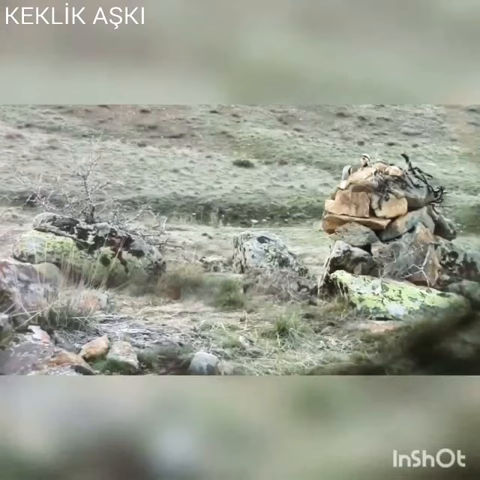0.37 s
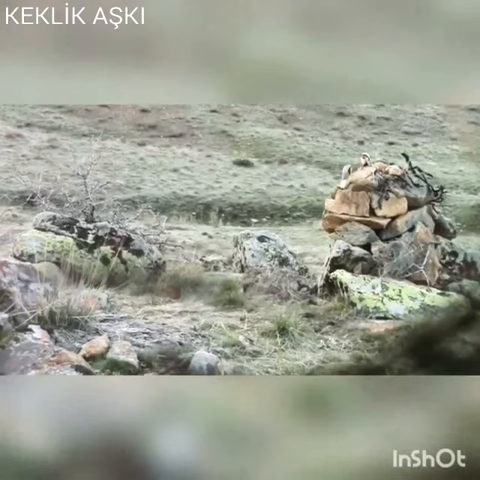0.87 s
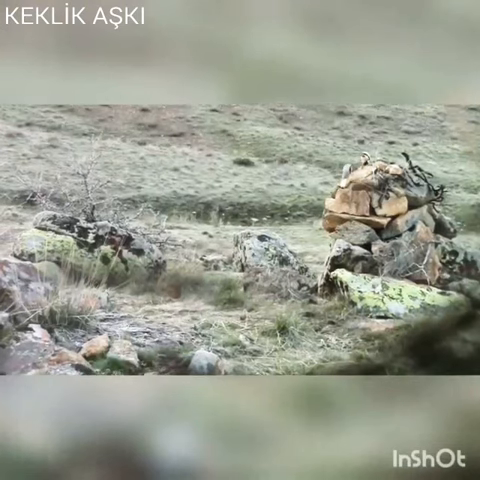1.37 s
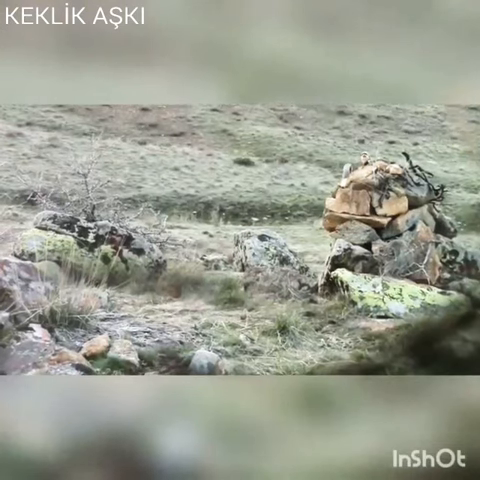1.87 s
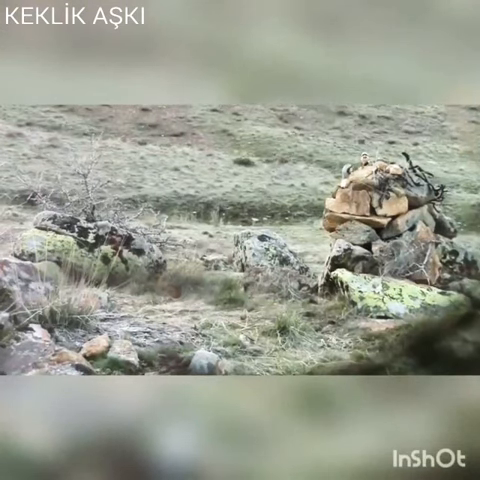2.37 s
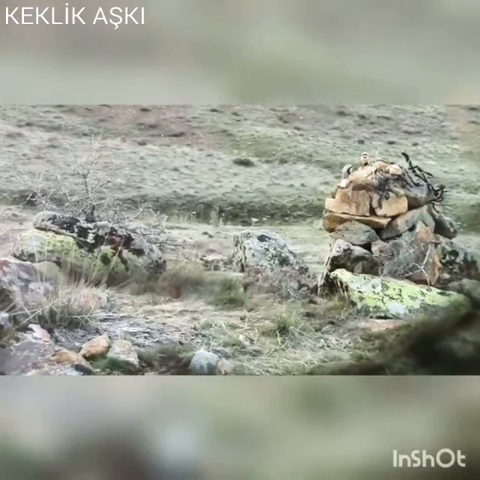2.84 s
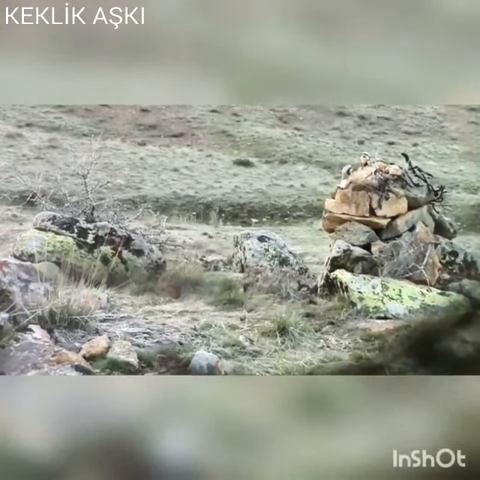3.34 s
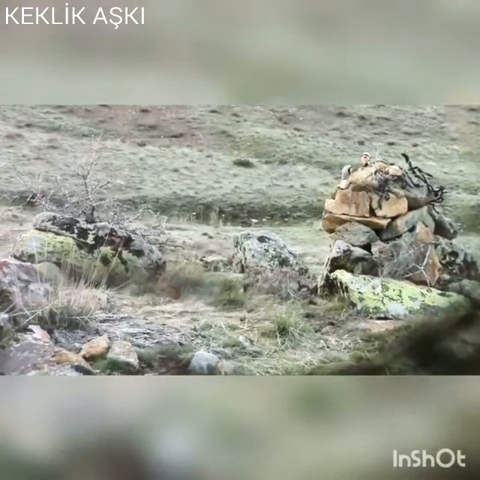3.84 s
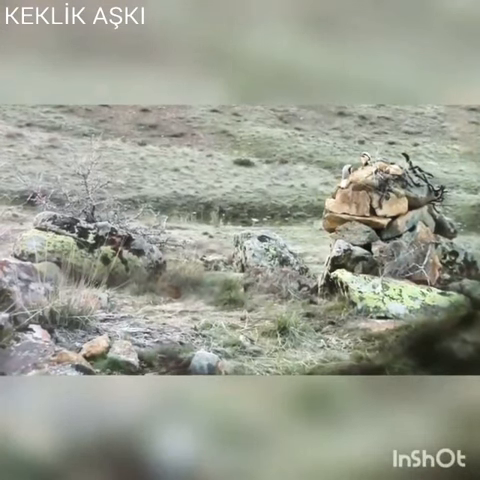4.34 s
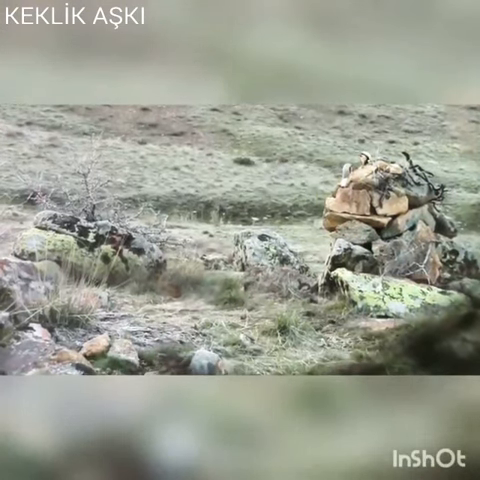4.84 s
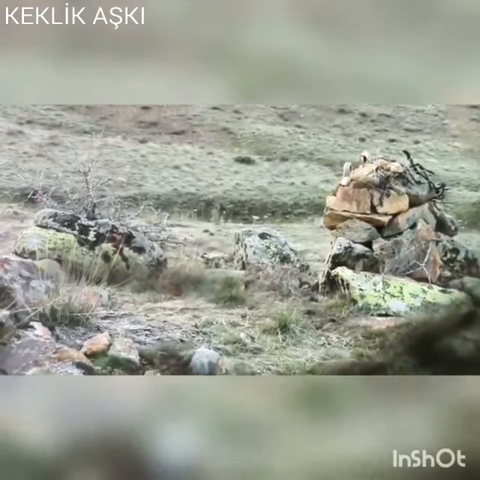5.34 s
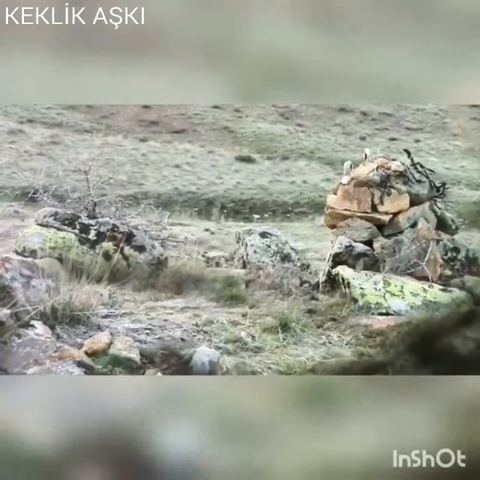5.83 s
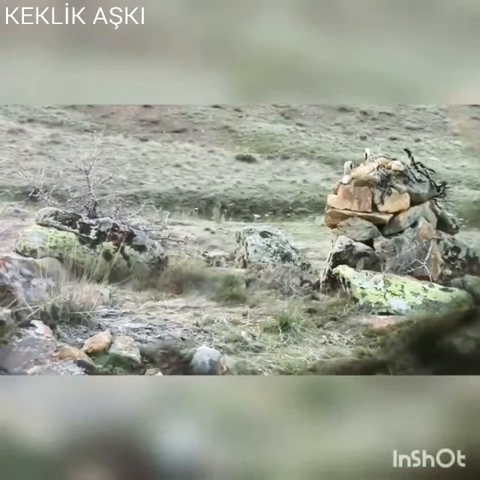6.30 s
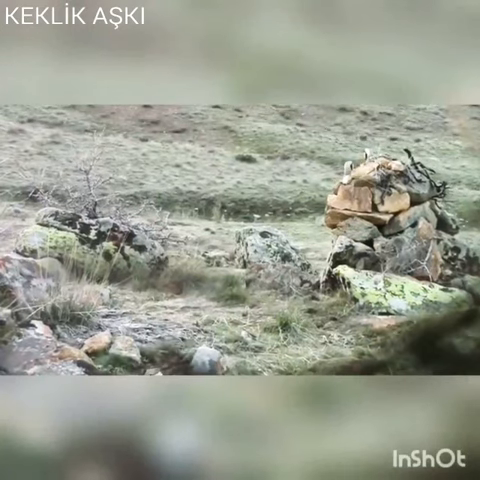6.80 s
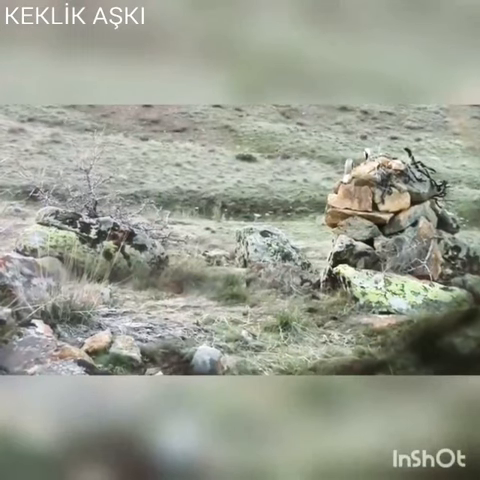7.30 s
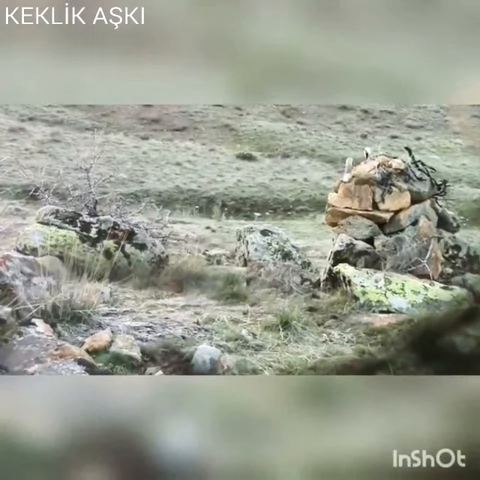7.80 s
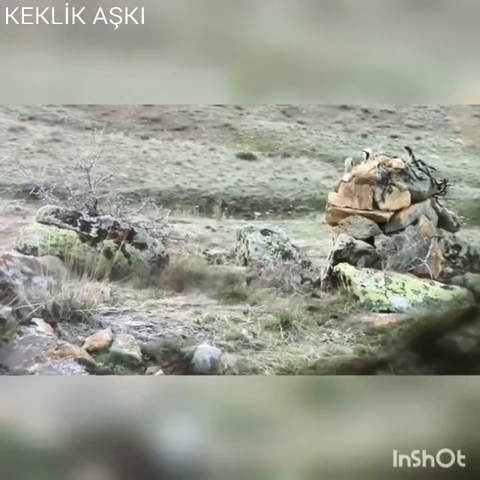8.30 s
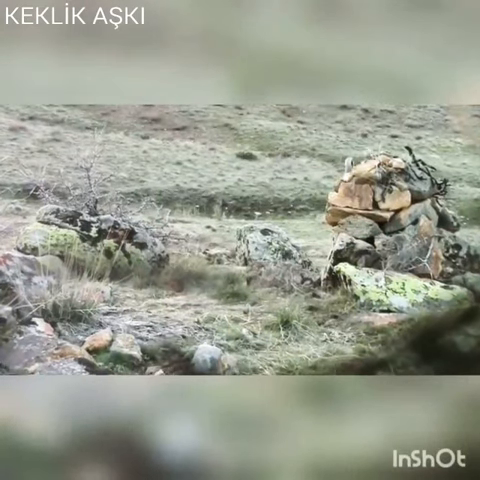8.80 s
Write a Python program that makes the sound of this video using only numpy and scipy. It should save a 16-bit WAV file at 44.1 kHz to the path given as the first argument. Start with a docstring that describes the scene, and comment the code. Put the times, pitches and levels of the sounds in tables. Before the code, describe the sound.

From 0 s, partridges call close by on an open rocky hillside over a very quiet, soft breeze. Piercing whistles, each arching up to about 4 kHz in under a tenth of a second, repeat every 0.3 to 0.45 s, framed by hoarse, buzzing rasps. Fast two-part chatter follows some calls near 0.1, 0.5, 1.7 and 2.4 s, with clear short pips and low throaty clucks between. The strongest calls fall around 0.3, 0.7 and 2.5 s. Rapid lower chatter bursts at 3.5 and 3.8 s, then stops before 4 s. From 4 to 7 s the whistles are weaker, huskier and lower, with sinking rasps and more audible clucks. After about 7.4 s only soft clucks, roughly every 0.35 s, and faint distant birds remain until nearly 9 s. Rocks return faint quick echoes; the birds sit near centre.

```python
"""Partridges call on an open rocky hillside in a light breeze, which is coloured noise.
At once come arched whistles (gliding near sines) framed by hoarse rasps (pulses through a throat filter).
Fast chatter, short pips and low clucks join in; farther birds chatter and rocks return faint, quick echoes.
The chatter stops before 4 s; later calls are weaker and huskier, and at the end clucks and far birds remain."""
import sys
import numpy as np
from scipy import signal
from scipy.fft import rfft, irfft
from scipy.io import wavfile
from scipy.ndimage import uniform_filter1d

SR = 44100
rng = np.random.default_rng(int(sys.argv[2]) if len(sys.argv) > 2 else 0)


def undo_db(level):
    """Turn decibels back into plain size, where 20 dB means ten times bigger."""
    steps = np.asarray(level, float) / 20
    return 10 ** steps


def dump(signal):
    """Clip the signal to [-1, 1] and save it as 16-bit WAV at the path in sys.argv[1]."""
    limited = np.clip(np.atleast_2d(signal).T, -1, 1)
    pcm = np.round(limited * 32767).astype(np.int16)
    wavfile.write(sys.argv[1], SR, pcm)


N = 393372


def rms_one(x):
    """Scale a sound to an average power of 1."""
    return x / np.sqrt(np.mean(x ** 2) + 1e-20)


def drift(rate_hz):
    """Smooth random wandering with a spread of 1: noise with its fast changes filtered out."""
    r = np.exp(-2 * np.pi * rate_hz / SR)
    warm_up = SR   # the first second is dropped, so that the filter has settled
    wandering = signal.lfilter([1], [1, -2 * r, r * r], rng.standard_normal(N + warm_up))
    return rms_one(wandering[warm_up:])


def resonance(x, hz, width_hz):
    """Let one band through, as a ringing hollow does; the gain at its centre is 1."""
    r = np.exp(-np.pi * width_hz / SR)
    feedback = [1, -2 * r * np.cos(2 * np.pi * hz / SR), r * r]
    return signal.lfilter([(1 - r * r) / 2, 0, (r * r - 1) / 2], feedback, x)


def note(start_s, length_s):
    """The sample positions of a note and its progress from 0 to 1."""
    at = np.arange(round(start_s * SR), min(round((start_s + length_s) * SR), N))
    return at, np.linspace(0, 1, len(at))


def swell(progress, skew, sharp):
    """One hump that rises and falls: early for a skew under 1, late above."""
    return np.abs(np.sin(np.pi * progress ** skew)) ** sharp


def turning(hz):
    """Phase in radians of a wave whose pitch follows hz: each sample adds its share of a cycle."""
    return 2 * np.pi * np.cumsum(hz) / SR


def clicks(cycles):
    """One click each time a count of cycles passes a whole number."""
    return np.diff(np.floor(cycles), prepend=0)


def low_harmonics(phase, first_db, third_db):
    """Chest tone: three harmonics, of which the second is the strongest."""
    first = undo_db(first_db) * np.sin(phase)
    third = undo_db(third_db) * np.sin(3 * phase)
    return np.sqrt(2) * (first + np.sin(2 * phase) + third)


def breeze():
    """Soft noise, alike in both ears except in the bass; its low mids rise and fall."""
    # tone colour of the breeze, overall level set below: (pitch_hz, relative level per Hz_db)
    colour_curve = [(30, -25), (130, -6), (330, -1.5), (800, -2.5), (1250, -4), (1620, -5), (2200, -9.5),
                    (11000, -26.5), (15500, -33.5)]
    # level of the low mids: (time_s, level_db)
    murmur_curve = [(0, -53), (1.1, -58), (1.55, -50.5), (1.998, -59), (3.702, -59), (4.15, -56.5),
                    (5.799, -65.5), (6.4, -50.5), (7.0, -71.5), (8.3, -70), (8.801, -55.5)]
    breeze_db = -56.5
    hz = np.fft.rfftfreq(N, 1 / SR) + 1
    curve_hz, curve_db = np.transpose(colour_curve)
    colour = undo_db(np.interp(np.log(hz), np.log(curve_hz), curve_db))
    ear_difference = 0.21 + 1 / (1 + (hz / 90) ** 2)   # large only in the bass
    spectra = rfft(rng.standard_normal((2, N))) * colour
    mid, side = irfft(spectra * [np.ones_like(hz), ear_difference], N)
    low_mids = resonance(resonance(rng.standard_normal(N), 310, 240), 390, 340)
    murmur = undo_db(np.interp(np.arange(N) / SR, *np.transpose(murmur_curve))) * rms_one(low_mids)
    scale = undo_db(breeze_db) / np.std(mid)
    return scale * (mid + side * [[1], [-1]]) + murmur


LOW_HZ, TAIL_S = 2620, 0.019   # low register of the whistles, length of their tails


def whistle_shape(t, lead_s, arch_s, top_hz, hoarse):
    """Pitch and dB against the arch: a low climbing lead, a leap to the arch, a drop to the tail."""
    climb_hz_per_s, lead_db = 13000, -1.5
    leap_hz, least_arch_hz = 3680, 202   # the arch starts and ends at leap_hz, or this far under its top
    tail_hz, tail_db, hoarse_tail_db = 2889, -5, 4   # hoarse calls lean on the tail
    edge_hz = min(leap_hz, top_hz - least_arch_hz)
    arch_progress = np.clip((t - lead_s) / arch_s, 0, 1)
    arch_curve_hz = edge_hz + (top_hz - edge_hz) * swell(arch_progress, 0.85, 2.0)
    tail_curve_hz = np.interp(t - lead_s - arch_s, [0, TAIL_S / 2], [tail_hz, LOW_HZ])
    parts = [t < lead_s, t < lead_s + arch_s]   # whatever is left is the tail
    hz = np.select(parts, [LOW_HZ + climb_hz_per_s * t, arch_curve_hz], tail_curve_hz)
    return hz, np.select(parts, [lead_db, 0], tail_db + hoarse_tail_db * hoarse)


def whistles():
    """Near sines with a shimmer; the weaker the call, the huskier and more broken it is."""
    # arched whistles, pitch before smoothing and waver, level before shimmer and the rocks' favours:
    # (start_s, low lead_s, high arch_s, top pitch_hz, level_db)
    calls = [(0.0, 0.00038, 0.04, 3800, -30.5), (0.299, 0.017, 0.081, 4383, -26),
             (0.659, 0.021, .058, 4350, -27), (1.121, 0.009, 0.042, 4200, -30.5),
             (1.415, 0.02, 0.035, 3770, -28), (1.868, .019, 0.029, 3770, -33.5),
             (2.171, 0.015, 0.046, 3836, -28.5), (2.241, 0.011, 0.013, 3680, -29.5),
             (2.518, 0.027, .054, 4438, -26.5), (2.869, 0.01, .028, 3884, -28.5),
             (3.168, .012, .036, 3770, -29), (3.616, .016, .03, 3553, -34),
             (4.046, 0.016, 0.033, 3467, -32), (5.063, 0.009, 0.017, 3500, -38),
             (5.515, 0.03, 0.028, 3650, -36.5), (5.949, 0.0097, 0.038, 3477, -38),
             (6.383, 0.018, 0.016, 3500, -38), (6.895, 0.011, 0.012, 3300, -39.5)]
    # pitches that the near rocks favour: (pitch_hz)
    hollows = [1900, 2562, 3020, 3770, 4350]
    attack_s, release_s = 0.0092, 0.0086
    tone = np.zeros(N)
    shimmer, waver = drift(100), 1 + 0.007 * drift(200)
    husk, breaks = drift(900), np.maximum(drift(60), 0)
    for start_s, lead_s, arch_s, top_hz, level_db in calls:
        at, progress = note(max(start_s, 0), lead_s + arch_s + TAIL_S)
        t = progress * len(at) / SR
        hoarse = np.clip(-level_db / 12 - 1.6, 0.1, 1)
        shape = whistle_shape(t, lead_s, arch_s, top_hz, hoarse)
        hz, part_db = uniform_filter1d(shape, size=110, mode="nearest")   # rounds the corners
        fades = np.minimum(t / attack_s, 1) * np.minimum(t[::-1] / release_s, 1)
        gain = undo_db(level_db + part_db + 3.5 * hoarse * np.tanh(shimmer[at])) * fades
        phase = turning(hz * waver[at])
        beating = np.clip((hz - 4050) / 150, 0, 1)   # only the top of the range beats
        flutter = 1 + 0.8 * beating * np.sin(2 * np.pi * 280 * at / SR)
        main = (flutter + 0.25 * hoarse * husk[at]) * np.sin(phase)
        # weaker cycles and a second voice
        side_tones = np.sin(phase / 2) + np.sin(3 * phase / 2) + 2.0 * np.sin(0.71 * phase)
        tone[at] += gain * (main + 0.2 * hoarse ** 3 * breaks[at] * side_tones)
        low_register = np.clip((3200 - hz) / 300, 0, 1)   # here an octave is added
        tone[at] += gain * undo_db(-17.5) * hoarse * low_register * np.sin(2 * phase)
    return tone + 2 * sum(resonance(tone, hz, 210) for hz in hollows)


def rasps():
    """Uneven pulses: opening rasps rise; closing ones sink, low harmonics late. Returns chest and beak."""
    # rasps that open a call: (start_s, length_s, chest level_db)
    openers = [(0.275, 0.04, -34), (0.643, 0.025, -34), (1.394, 0.026, -31.5), (2.139, 0.059, -37),
               (2.502, 0.039, -34), (2.838, 0.049, -31.5), (3.139, 0.054, -32.5), (3.444, 0.029, -47),
               (3.764, 0.027, -46.5), (4.033, 0.027, -39.5), (4.465, 0.044, -42.5), (5.493, 0.03, -39.5)]
    # rasps that close a call: (start_s, pulse rate before its bend_hz, chest level_db)
    closers = [(0.04, 450.5, -33), (0.396, 483, -29), (0.728, 465, -32.5), (1.162, 429, -39),
               (1.469, 448, -33), (1.92, 546, -36.5), (2.247, 454.6, -31), (2.593, 459.2, -31.5),
               (2.895, 454, -33), (3.202, 432, -34.5), (3.654, 582, -36.5), (4.086, 560.5, -36.5),
               (4.526, 531, -38), (5.119, 580, -35.5), (5.27, 434, -38), (5.581, 580, -36.5),
               (5.99, 670, -39), (6.424, 629, -39.5), (6.92, 641, -38), (7.417, 657.5, -41)]
    # the beak opens less as the birds calm down: (time_s, level through the beak against the chest_db)
    beak_opening = [(0, 2), (3.3, 2), (4.5, -0.5), (7.5, -8.5)]
    opener_hz, opener_rise = 628, 0.52   # pulse rate at the start, share of it gained
    closer_cycles, closer_drop = 35.5, 0.99   # length in cycles of the listed rate, share of it lost early
    chest, beak = np.zeros(N), np.zeros((2, N))
    jitter, noise = drift(150), rng.standard_normal(N)
    ragged = undo_db(1.8 * np.tanh(drift(60)))
    calls = [(start_s, length_s, opener_hz, db, True) for start_s, length_s, db in openers]
    calls += [(start_s, closer_cycles / hz, hz, db, False) for start_s, hz, db in closers]
    for start_s, length_s, hz, chest_db, opens in calls:
        at, progress = note(start_s, length_s)
        if opens:
            settling, shakiness = 1 - progress, 0.03
            bend = 1 + opener_rise * progress ** 2
        else:
            settling, shakiness = progress, 0.14
            bend = 0.97 + closer_drop * (1 - progress) ** 3.6
        shake = 1 + (0.02 + shakiness * (1 - progress)) * jitter[at]
        phase = turning(hz * bend * shake)
        harmonics = low_harmonics(phase, first_db=-7.0, third_db=-6)
        chest[at] += undo_db(chest_db) * swell(settling, 1.35, 1.3) * ragged[at] * harmonics
        closing = clicks(phase / (2 * np.pi))
        turbulence = 0.02 * noise[at] * (1 + np.cos(phase))
        beak_db = chest_db + np.interp(start_s, *np.transpose(beak_opening))
        source = undo_db(beak_db) * rms_one(closing + turbulence) * ragged[at]
        # the first row drives the lowest throat resonance, the second all the others
        beak[:, at] += source * [swell(progress, 0.86, 1), swell(progress, 0.8, 1.6)]
    return chest, beak


def throat(source):
    """Side-by-side resonances colour the pulses; narrow bands of the result swell and fade by chance."""
    # throat and open beak, each resonance applied twice: (pitch_hz, width of one pass_hz, level_db)
    resonances = [(1950, 606, -0.5), (2620, 77, 1.5), (3056, 460, 0), (4090, 1370, -8), (6970, 440, -26)]
    voiced = np.zeros(N)
    for k, (hz, width_hz, level_db) in enumerate(resonances):
        once = resonance(source[min(k, 1)], hz, width_hz)
        # alternating signs and two passes leave dark valleys between the resonances
        voiced += (-1) ** k * undo_db(level_db) * resonance(once, hz, width_hz)
    out = np.zeros(N)
    for k, hz in enumerate(np.geomspace(1100, 9000, 18)):
        chance_gain = undo_db(7 * np.tanh(drift(45)))
        out += (-1) ** k * chance_gain * resonance(voiced, hz, hz / 8)
    return out


def chatter(waver, noise):
    """Fast syllables: a thin rasp leads in, a low note leaps to a high one. Returns the notes and the rasp."""
    # syllables: (start_s, low note level_db, high note level_db)
    syllables = [(.116, -26.5, -32.5), (.147, -30.5, -38), (.47, -28.5, -35.5), (.503, -31.5, -41.5),
                 (1.703, -35, -40.5), (1.742, -36.5, -46.5), (2.347, -24, -31), (2.394, -30, -37.5),
                 (3.492, -28, -44), (3.527, -31, -28.5), (3.583, -34, -37.5), (3.813, -28.5, -56),
                 (3.844, -27, -29), (3.898, -30, -39.5)]
    low_hz, low_s, high_hz, high_s = 1900, 0.014, 2750, 0.018   # pitches before a random spread
    leap_s, rasp_s, rasp_hz, rasp_db = 0.011, 0.018, 670, -11   # rasp level against the louder note
    notes, rasp = [], np.zeros(N)
    spread = 1 + 0.025 * rng.standard_normal((len(syllables), 2))
    for (start_s, low_db, high_db), (low, high) in zip(syllables, spread):
        notes.append((start_s, low_s, low_hz * low, 0.08, low_db))
        notes.append((start_s + leap_s, high_s, high_hz * high, -0.06, high_db))
        at, progress = note(start_s - rasp_s / 2, rasp_s)
        cycles = np.cumsum(rasp_hz * high * (1 + 0.3 * progress) * waver[at]) / SR
        pulses = clicks(cycles) + 0.05 * noise[at]
        rasp[at] += undo_db(max(low_db, high_db) + rasp_db) * np.sin(np.pi * progress) * rms_one(pulses)
    return notes, rasp


def pips():
    """Brief gliding tones with a faint octave, chatter notes among them. Returns tone and breathy rasp."""
    # short clear glides: (start_s, length_s, middle pitch_hz, share of the pitch gained, level_db)
    glides = [(0.963, 0.036, 1070, -0.25, -44.5), (1.106, 0.02, 3130, 0.32, -39),
              (1.166, 0.033, 1900, .1, -25.5), (1.208, 0.016, 2670, 0.19, -33),
              (1.474, 0.0184, 2750, .15, -24), (1.673, 0.022, 990, -.1, -38),
              (2.257, .023, 2800, .17, -24.5), (2.271, .015, 3280, -.3, -25),
              (2.327, 0.016, 1850, 0.17, -28), (2.777, 0.06, 491, 0.058, -41.5),
              (4.478, 0.065, 2680, 0.386, -38.5), (4.514, 0.015, 2410, -0.53, -34.5),
              (4.889, 0.084, 688, -0.17, -44.5), (5.043, 0.035, 3380, 0.11, -38),
              (5.101, 0.023, 2620, -0.044, -32), (5.933, 0.062, 3190, .19, -41.5),
              (6.372, 0.034, 3330, .19, -44), (6.878, 0.031, 3210, 0.076, -38),
              (7.376, 0.02, 3030, .1, -39), (7.39, 0.022, 2630, 0.15, -34.5),
              (7.41, 0.023, 2570, 0.17, -34.5), (7.909, 0.063, 1008, -0.17, -36.5)]
    tone, waver, noise = np.zeros(N), 1 + 0.014 * drift(150), rng.standard_normal(N)
    chatter_notes, rasp = chatter(waver, noise)
    for start_s, length_s, hz, glide, level_db in list(glides) + chatter_notes:
        at, progress = note(start_s, length_s)
        phase = turning(hz * (1 + glide * (progress - 0.5)) * waver[at])
        gain = undo_db(level_db) * swell(progress, 1.0, 0.57)
        tone[at] += np.sqrt(2) * gain * (np.sin(phase) + undo_db(-25.0) * np.sin(2 * phase))
        if 1500 < hz < 4000:
            rasp[at] += undo_db(-15) * gain * noise[at]
    return tone, rasp


def clucks():
    """Throaty notes, beak almost shut, shaky at first. Returns tone and leaking pulses, more from quick ones."""
    # soft low clucks: (start_s, middle pulse rate_hz, level_db)
    cluck_list = [(0.16, 536, -42.5), (0.51, 553, -41.5), (1.029, 365, -38), (1.23, 537, -42.5),
                  (1.553, 428, -42.5), (1.773, 357.6, -36), (2.071, 602, -42), (2.421, 563, -39.5),
                  (2.976, 501, -39.5), (3.28, 491, -43), (3.438, 437, -46.5), (3.502, 376, -40.5),
                  (3.909, 443, -43.5), (3.934, 361.6, -36.5), (4.14, 420, -41), (4.383, 362, -37.5),
                  (4.814, 427, -40.5), (4.852, 393, -44), (5.036, 339, -46.5), (5.252, 408, -39.5),
                  (5.676, 423, -42), (5.838, 354.5, -39), (6.12, 415, -46.5), (6.281, 359.5, -38.5),
                  (6.73, 346, -39), (7.222, 359, -40), (7.266, 470, -43), (7.31, 396, -44.5),
                  (7.348, 341, -41), (7.445, 350, -45), (7.702, 348.4, -39), (8.05, 312.5, -42),
                  (8.398, 330, -41.5), (8.708, 341, -44.5)]
    out, leak, jitter = np.zeros(N), np.zeros(N), drift(220)
    for start_s, hz, level_db in cluck_list:
        at, progress = note(start_s, 0.042)
        shake = 1 + 0.28 * (1 - progress) * jitter[at]
        phase = turning(hz * (1.06 - 0.12 * progress) * shake)
        gain = undo_db(level_db) * swell(progress, 1.07, 0.24)
        out[at] += gain * low_harmonics(phase, first_db=-12.0, third_db=-7.0)
        leak_db = -26 + 13.6 * (hz > 480)
        leak[at] += undo_db(leak_db) * gain * rms_one(clicks(phase / (2 * np.pi)))
    return out, leak


def far_chatter(count):
    """Distant birds: hoarse falling notes, the clear ones among fainter ones at random in one narrow band."""
    # clear notes, level before the husky flicker: (start_s, starting pitch_hz, peak level_db)
    clear = [(0.2106, 1610, -45.5), (0.5585, 1650, -45.5), (1.2794, 1640, -46.5), (1.55, 1594, -49),
             (1.62, 1650, -51), (3.085, 1630, -51), (4.19, 1660, -53.5), (4.62, 1820, -54),
             (4.746, 1734, -53), (5.785, 1733, -52.5), (7.1003, 1765, -53.5), (7.15, 1740, -52.5),
             (7.15, 5050, -61.5), (7.5524, 1730, -50.5), (8.58, 1670, -60), (7.74, 1750, -50.5),
             (8.145, 1680, -51), (8.2711, 1775, -51.5), (8.85, 1740, -52.5)]
    pitch_loss = 0.1   # share of its pitch that a note loses
    out, husk, shake = np.zeros(N), 1 + 0.66 * drift(130), 1 + 0.018 * drift(200)
    faint = rng.random((count, 3)) * [N / SR, 150, -8] + [0, 1650, -54]   # same columns as the clear notes
    for start_s, hz, peak_db in [*clear, *faint]:
        at, progress = note(start_s, 0.049)
        phase = turning(hz * (1 - pitch_loss * progress) * shake[at])
        out[at] += undo_db(peak_db) * swell(progress, 0.62, 0.29) * np.sin(phase)
    return out * husk


def beak_hiss(birds):
    """Air hisses past the beak, more so when loud: high noise that follows the calls. Returns two signals."""
    loudness = uniform_filter1d(np.abs(resonance(birds, 3200, 3000)), size=200)
    effort = np.abs(loudness) ** 1.24
    hiss = resonance(effort * rng.standard_normal((2, N)), 9870, 3000)
    return resonance(hiss, 9870, 3000) * undo_db(-6.0)


def rocks(x):
    """A few echoes at random delays, other ones for each ear; later ones are weaker."""
    out = np.zeros((2, N))
    lags = (SR * rng.uniform(0.003, 0.06, 16)).astype(int)
    for k, lag in enumerate(lags):
        out[k % 2, lag:] += undo_db(-27 - 250 * lag / SR) * x[:-lag]
    return out


def scene():
    """Birds nearly centred, with echoes, over the breeze."""
    air = breeze()
    whistle = whistles()
    chest, beak = rasps()
    pip, breath = pips()
    cluck, leak = clucks()
    voiced = undo_db(17) * throat(beak + breath + leak + 1e-18)
    birds = whistle + pip + chest + cluck + voiced + far_chatter(count=60)
    birds = signal.sosfilt(signal.butter(3, 260, "high", fs=SR, output="sos"), birds)   # thins the bass
    centre, edge = beak_hiss(birds)
    # added to one ear and taken from the other
    wide = 0.115 * edge - undo_db(-20) * resonance(birds, 4200, 2000)
    return birds + centre + wide * [[1], [-1]] + rocks(birds) + air


def top_cut(x):
    """Nothing passes above the cut-off."""
    return signal.sosfilt(signal.butter(12, 15710, fs=SR, output="sos"), x)


def record(dry):
    """Turn the finished mix into the sound that is saved."""
    return top_cut(dry)


dry = scene()
out = record(dry)
dump(out)
```